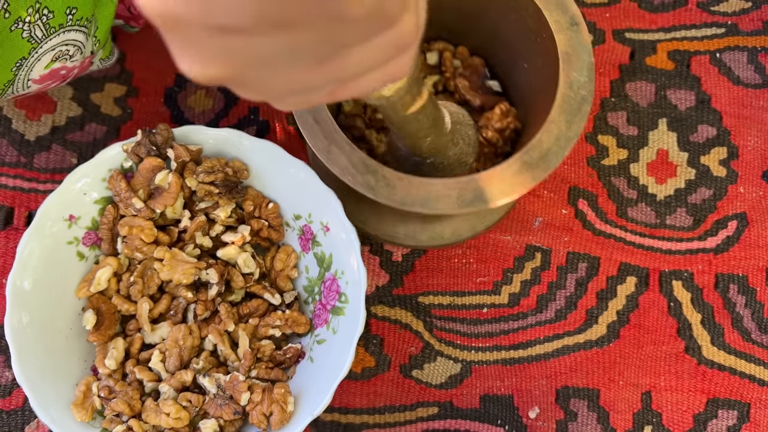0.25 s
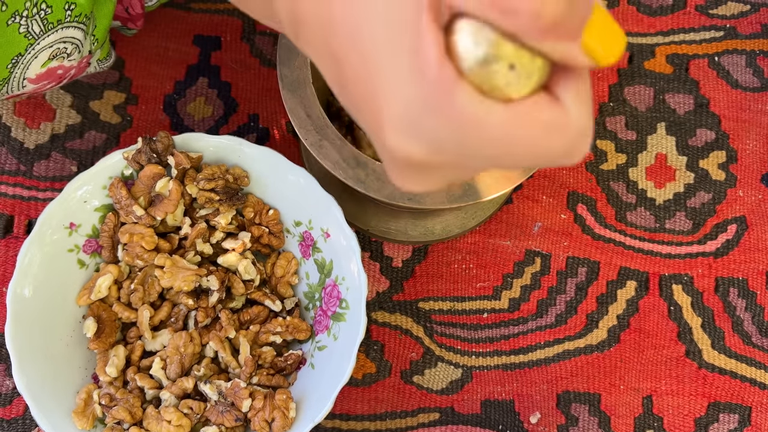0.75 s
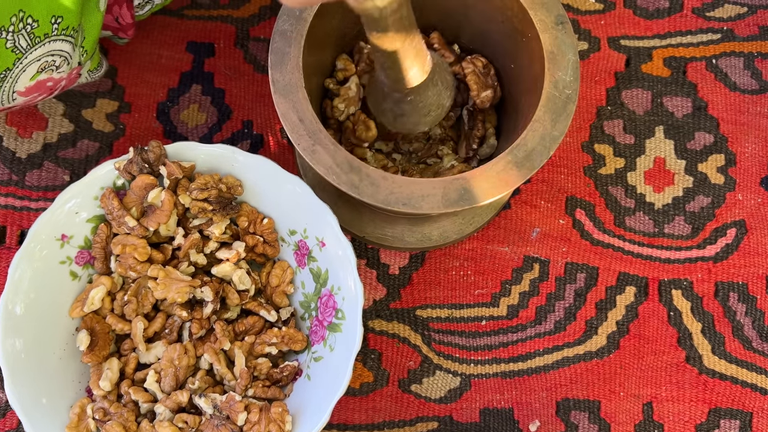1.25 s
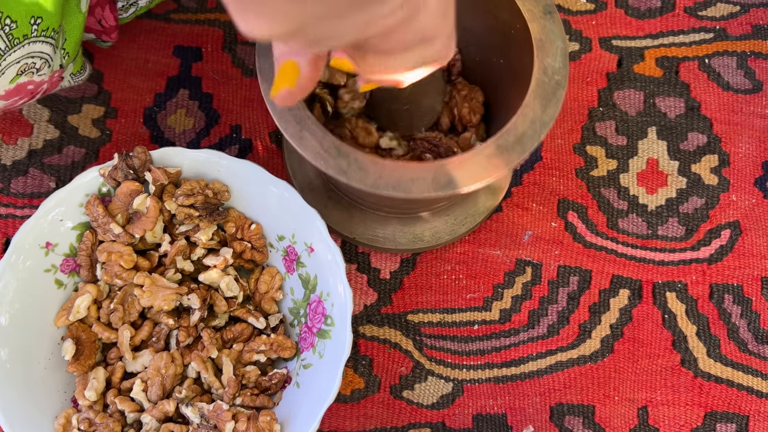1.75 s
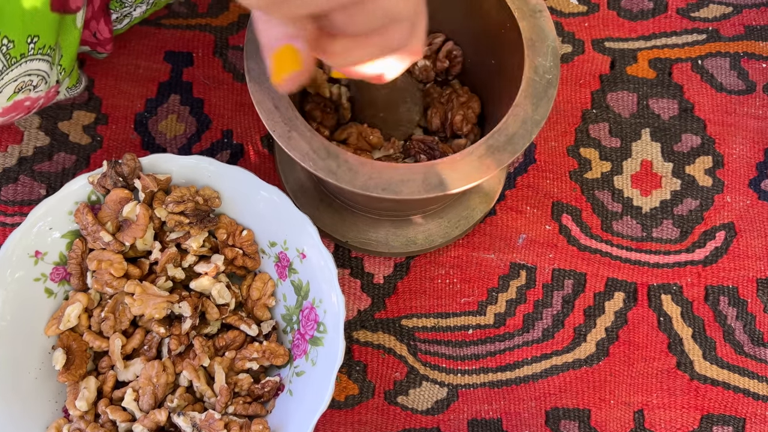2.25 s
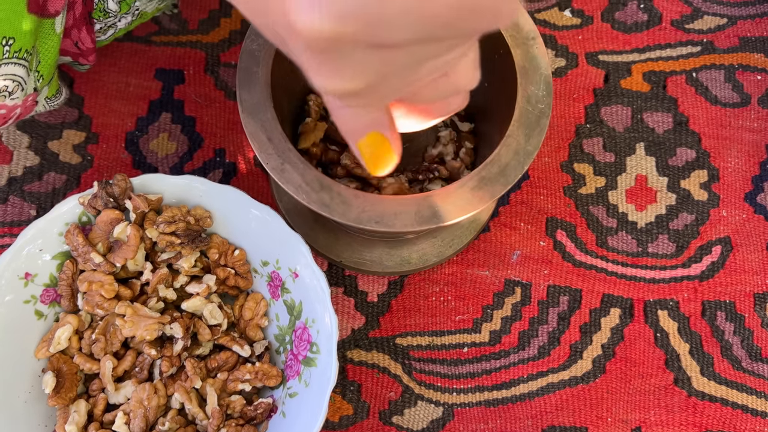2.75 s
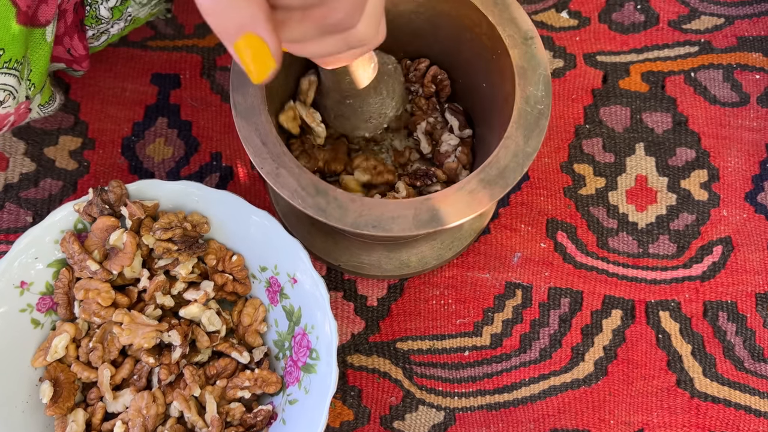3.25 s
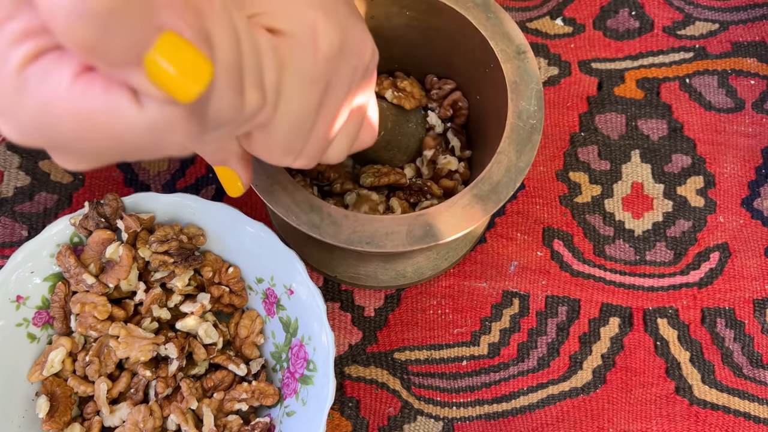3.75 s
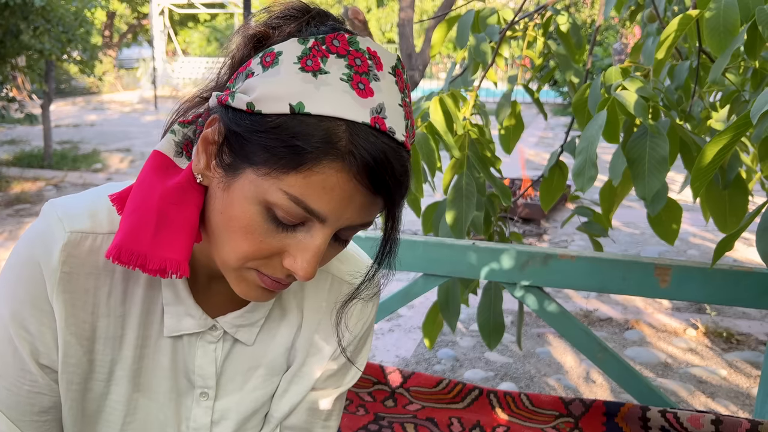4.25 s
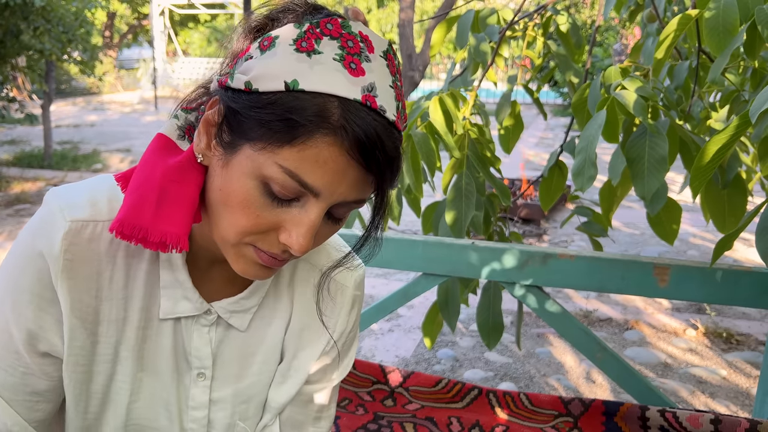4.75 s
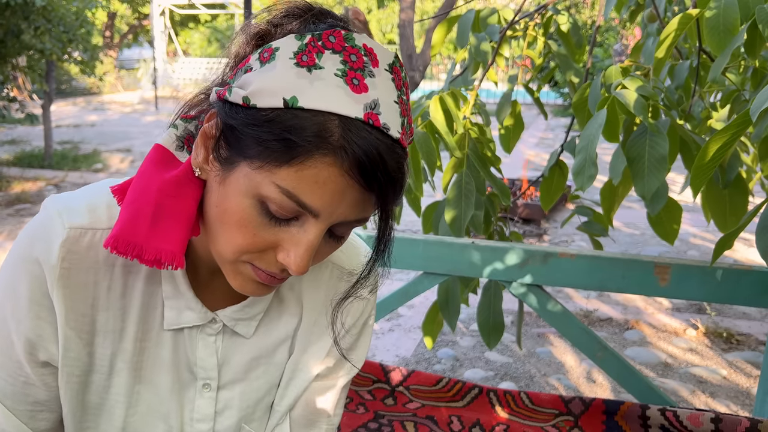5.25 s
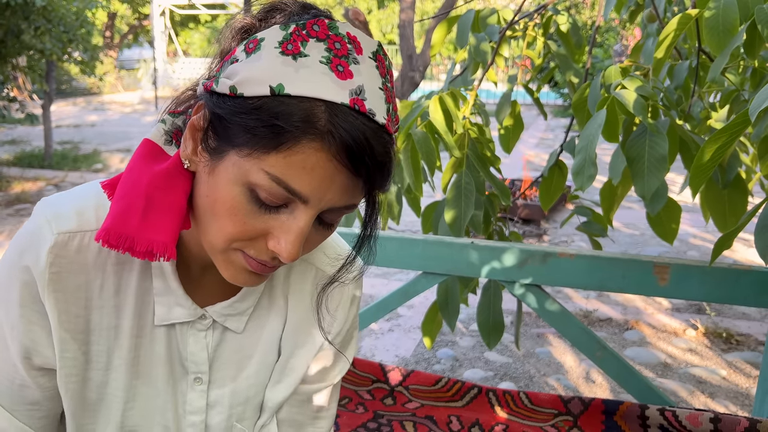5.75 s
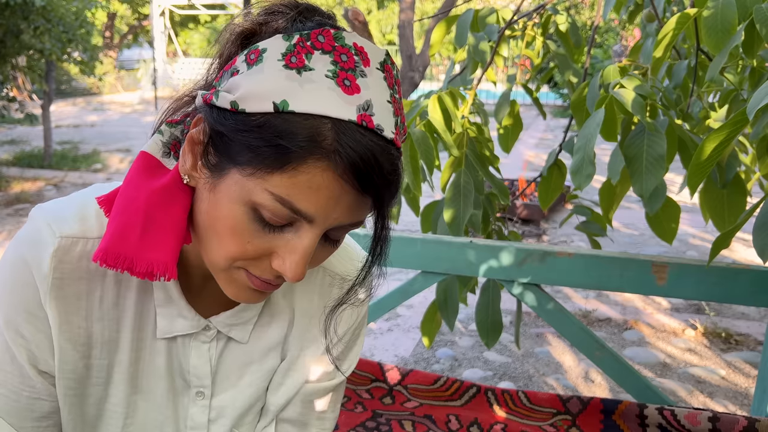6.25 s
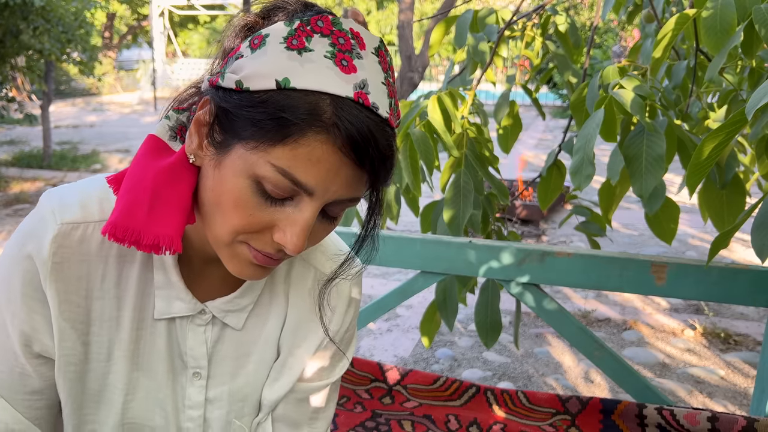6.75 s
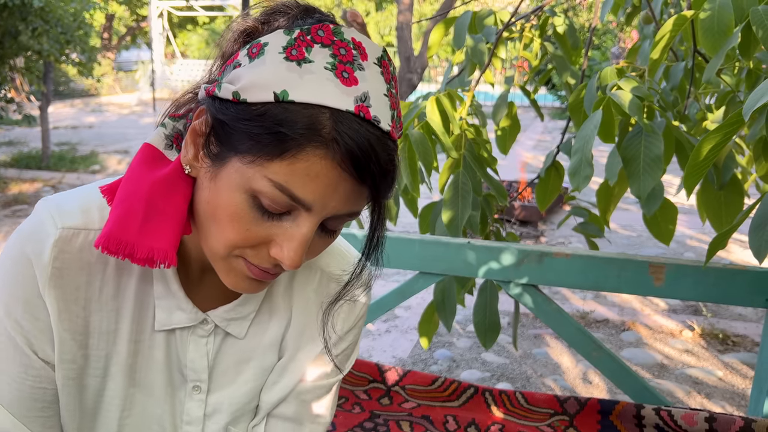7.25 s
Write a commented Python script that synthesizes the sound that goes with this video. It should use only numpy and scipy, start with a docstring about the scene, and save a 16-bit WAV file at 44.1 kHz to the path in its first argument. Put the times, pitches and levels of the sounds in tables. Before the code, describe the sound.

A brass pestle clinks twice against a brass mortar, then crushes walnuts with sharp snaps, gritty crunches and dull thuds against the ground. Further strikes on the wall set the bowl ringing now and then. The crunching grows lighter in the second half, with a hollow knock among the clinks. The microphone is close, outdoors, with faint distant traffic, leaves and a barely audible bird near the end.

```python
"""Outdoors, close to a brass mortar on a rug; traffic and leaves murmur far off throughout.
The brass pestle first strikes the wall three times, and the bowl rings in close, beating pairs of modes.
Then it crushes walnuts: kernels crunch and snap and the mortar thuds on the ground, between more blows
on the wall and a few hollow knocks. Near the end come two faint bird cheeps and a short whistle."""
import sys
import numpy as np
from scipy import signal
from scipy.fft import rfft, irfft, next_fast_len
from scipy.io import wavfile
from scipy.ndimage import uniform_filter1d, map_coordinates

SR = 44100
rng = np.random.default_rng(int(sys.argv[2]) if len(sys.argv) > 2 else 0)


def wav_record(signal):
    """Record a signal, one row per channel, as 16-bit PCM in the file named by sys.argv[1]."""
    frames = np.transpose(np.atleast_2d(signal))
    bounded = np.clip(frames, -1, 1)
    # unit amplitude maps onto the largest positive 16-bit level
    quanta = np.round(bounded * 32767).astype(np.int16)
    wavfile.write(sys.argv[1], SR, quanta)


N = 331191

# Modes of the bowl, close twins side by side: f/Hz
MODE_HZ = [1162, 1173, 1185, 2046, 2722, 2736, 3220, 4097, 4089, 4926, 4944, 5057, 5068, 5608, 5620, 6515,
           6539, 6577, 7074, 7500, 7885, 8426, 8788, 8893, 9410, 9725, 11760, 12172, 12493, 12570, 14810]
# The same modes: level/dB, t60/s, right minus left/dB, lead at the right microphone/rad
MODES = [(0.8, 0.92, -3.5, 0), (-2.8, 1.185, 2, -1.76), (4.5, 0.17, -0.5, 1.5), (-2, 0.035, 8.5, 7),
         (3, 0.65, -3.5, 2.5), (2.5, 1.13, 0.5, 2.5), (-0.5, 0.064, 13, 4), (11, 0.53, -11, 2),
         (-11, 1.7, -10, 7.5), (1.5, 0.35, -0.5, 1.5), (-6, 0.333, -17, 19.5), (-26, 0.35, -5.5, 3.5),
         (1, 0.21, -26.5, 5), (5, 0.43, -9.5, 2), (9.5, 0.41, -12.5, 3.2), (-10.5, 0.19, -3, 5.5),
         (2.5, 0.22, -15.5, 15), (-9, 0.48, -6, 4.5), (-11, 0.24, -2, -2), (2.5, 0.22, 4.5, 0.7),
         (-12, 0.18, 1, 0.3), (-18, 0.21, 2, 1.2), (-8, 0.3, -4.5, 1.7), (-9, 0.32, -3, 1),
         (-12, 0.19, -3, 3), (-10, 0.43, 0, 4.5), (-22, 0.28, 1, 2), (-9, 0.52, -1.5, 0.3),
         (-20, 0.37, -1.5, .7), (-22, 0.28, -1, 1.4), (-12, 0.27, 2, -2)]
# Pestle on the wall: t/s, low twins' share/rad, upper low twin's phase/rad, middle twins' share/rad,
# seven family levels/dB (low twins, short clang, middle twins, around 4.1, 5, 5.6 and 7.5 kHz),
# damping factor, right side/dB, crack/dB, chatter/dB, time until nuts or hand muffle the ring/s
BLOWS = [(0.086, 1.7, -2.5, 0.44, -55, -59, -60, -57, -71, -62, -70, 2, 5.5, -32, -48, 0.069),
         (0.2144, 1.52, 1, 0.066, -18, -23, -27.5, -29.5, -28.5, -23.5, -30, 1.52, -5.5, -19.5, -74, 0.2),
         (0.3, 1.06, 2.5, 0.068, -28.5, -13.5, -28.5, -25.5, -32, -22, -42, 2.7, 0, -28.5, -35.5, 0.15),
         (1.4178, 1.38, -3, 0.7, -13.5, -62, -32.5, -42.5, -43, -50, -42, 0.97, -3.5, -25.5, -55, 0.6),
         (2.334, 1.3, -1.5, 0.79, -45.5, -66, -58, -73, -82, -75, -80, 0.8, -5.5, -64, -65, .15),
         (3.15, 0.72, 0, 1, -49.5, -57, -51.5, -63, -51, -75, -70, 0.74, -3.5, -41, -65, 0.2),
         (3.334, 1.09, 1.14, 0.84, -21.5, -9, -21.5, -23.5, -19.5, -41, -39.5, 1.31, -3, -39.5, -23.5, 0.26),
         (3.968, .06, 9, .5, -41.5, -66, -63, -68, -55.5, -68.5, -72, 1.3, -6.5, -40.5, -56, 0.064),
         (4.0614, 0.91, -2, 2.18, -24, -61, -38, -54.5, -59, -56.5, -73, 1.24, -9.5, -40, -62, 0.22),
         (5.011, 1.07, 2, 1.38, -20, -17, -23, -44, -20, -34, -59, 1.26, -10, -23, -31, 0.27),
         (5.612, 1.3, -4, 1.5, -59, -78, -79, -63, -61.5, -65, -77, 0.74, -8.5, -62, -73, 0.13),
         (6.619, 1.6, -0.5, 0.9, -58, -74, -63, -73.5, -54.5, -79, -84, 0.93, -7, -58.5, -70, 0.18),
         (6.7892, 0.77, -1.4, 1.6, -24, -40, -42, -50, -34, -43.5, -59, 1.13, -6, -29, -47.5, 0.21)]
# Spectra of breaking walnut, its sharp edge and its body: f/Hz, level/dB
SHARP_SPECTRUM = [(1500, -49.5), (2500, -8), (4000, -2), (6800, 2.5), (9000, -1), (12000, 1.5), (15500, 0)]
BODY_SPECTRUM = [(150, 8), (500, -12), (760, 9), (1200, -11.5), (1880, 6.5), (2250, 2), (2630, 6.5),
                 (3400, 0), (4010, -1), (5000, -15), (7000, -5.5)]
# How alike the two microphones hear a close source: f/Hz, correlation
NEAR_LIKENESS = [(100, .97), (400, .8), (1500, .7), (5000, .4), (7500, .5), (9000, .97), (15000, .98)]


def amp(db):
    """Gain of a level in dB."""
    return 10 ** (np.asarray(db) / 20)


def unit(x):
    """x at rms 1."""
    return x / np.sqrt(np.mean(x ** 2) + 1e-20)


def along(points, hz):
    """Interpolate (f/Hz, value) points on a log frequency axis."""
    f, v = np.transpose(points)
    return np.interp(np.log(hz + 1), np.log(f + 1), v)


def curves(rows):
    """One value per sample for each column after the time."""
    s, *cols = np.transpose(rows)
    return [np.interp(np.arange(N) / SR, s, c) for c in cols]


def wobble(rate):
    """A smooth random curve, rate knots a second."""
    return map_coordinates(rng.standard_normal(int(N * rate / SR) + 4), [np.arange(N) * rate / SR])


def filtered(x, response):
    """x times a complex response of frequency."""
    m = next_fast_len(N + SR // 2)
    return irfft(rfft(x, m) * response(np.fft.rfftfreq(m, 1 / SR)), m)[..., :N]


def shaped(x, spectrum):
    """x filtered by (f/Hz, level/dB) points."""
    return filtered(x, lambda hz: amp(along(spectrum, hz)))


def add(track, s, sound):
    """Lay a sound into a track at time s."""
    part = track[..., round(s * SR):][..., :sound.shape[-1]]
    part += sound[..., :part.shape[-1]]


def microphones(pair, likeness):
    """Two unrelated signals become left and right, with the microphones' likeness, balance and lead."""
    # Left microphone over the right: f/Hz, level/dB
    balance = [(100, 1.5), (700, 4), (2400, 2.5), (4800, 7.5), (7000, 7), (9000, 0.5), (15000, 0)]
    # Left microphone ahead of the right: f/Hz, phase/rad
    lead = [(200, 0), (800, .3), (1700, 1.2), (2750, 2), (3450, 3.1), (5400, 7), (7200, 8.4), (9000, 5.3),
            (10000, 3.4), (11000, 1.7), (12050, -.1), (13100, -2.1), (14100, -3.7), (15200, -5.8)]
    turn = lambda hz: np.arccos(np.clip(along(likeness, hz), 0, 1)) / 2
    mid, side = filtered(pair, lambda hz: np.array([np.cos(turn(hz)), np.sin(turn(hz))]))
    half = lambda hz: amp(along(balance, hz) / 2) * np.exp(1j * along(lead, hz) / 2)
    return filtered(np.array([mid + side, mid - side]), lambda hz: np.array([half(hz), 1 / half(hz)]))


def traffic_and_leaves():
    """Far off, traffic rumbles and leaves hiss softly, both wavering."""
    # Course of the background: t/s, traffic/dB, leaves/dB
    levels = [(0.0, -55.5, -53.5), (0.6, -47, -58.5), (1.2, -52.5, -58), (1.82, -51, -57.5),
              (4.2, -53, -58.5), (5, -51, -57.5), (6.15, -55.5, -60), (7.15, -51.5, -57),
              (7.51, -54, -61.5)]
    # Spectra of the rumble and the hiss: f/Hz, level/dB
    traffic_spectrum = [(20, -50.5), (40, -10), (65, 1), (110, 5.5), (160, -6.5), (260, -15.5), (400, -55)]
    leaf_spectrum = [(150, 5.5), (290, 1), (420, 2), (700, -7.5), (1160, -7.5), (2000, -15), (3000, -24),
                     (5000, -21), (6740, -17.5), (9000, -48.5), (16000, -48)]
    # How alike the microphones hear a distant source: f/Hz, correlation
    far_likeness = [(60, .97), (200, .85), (500, .3), (5000, .2), (7500, .4), (9000, .95), (15000, .97)]
    traffic_db, leaves_db = curves(levels)
    noise = lambda spectrum: unit(shaped(rng.standard_normal((2, N)), spectrum))
    rumble = amp(traffic_db + 1.6 * wobble(6)) * noise(traffic_spectrum)
    hiss = amp(leaves_db + 1.4 * wobble(6.5)) * noise(leaf_spectrum)
    return microphones(rumble + hiss, far_likeness)


def bird_cheeps():
    """A distant bird cheeps twice: falling tones, hoarse with pitch jitter."""
    # Calls: t/s, level/dB
    calls = [(6.405, -61), (6.601, -56)]
    start_hz, fall_hz_per_s, rough_hz, length_s = 2750, 17000, 258, 0.051
    out, t = np.zeros((2, N)), np.arange(round(length_s * SR)) / SR
    for s, db in calls:
        jitter = np.array([wobble(510)[:len(t)], wobble(433)[:len(t)]])
        hz = start_hz - fall_hz_per_s * t + rough_hz * jitter
        tone = np.sin(2 * np.pi * np.cumsum(hz, axis=1) / SR)
        add(out, s, amp(db) * np.sin(np.pi * t / length_s) * tone)
    return out


def bird_whistle():
    """Off to the right, a faint whistle swings in pitch; a second voice above it soon fades."""
    middle_hz, swing_hz, swing_s, length_s = 4050, 440, .056, .09
    out, t = np.zeros((2, N)), np.arange(round(length_s * SR)) / SR
    hz = middle_hz + swing_hz * np.sin(2 * np.pi * t / swing_s) + 100 * wobble(293)[:len(t)]
    phase = 2 * np.pi * np.cumsum(hz) / SR
    voices = np.sin(phase) + amp(-3) * np.exp(-(t / .035) ** 2) * np.sin(1.16 * phase)
    envelope = amp(-67 + 3 * wobble(213)[:len(t)]) * np.sin(np.pi * t / length_s) ** 0.38
    add(out, s=7.382, sound=envelope * voices * amp([[-6], [3]]))
    return out


def ground_thuds():
    """The mortar thuds on the ground: a low tone of sagging pitch in a puff of dull noise."""
    # Thuds through the rug: t/s, level/dB, starting f/Hz
    thuds = [(0.208, -47, 109), (0.547, -39.5, 97.6), (0.722, -34.5, 82.6), (0.861, -41.5, 159),
             (1.012, -43.5, 80.6), (1.798, -26, 70.5), (1.928, -42, 88.5), (1.994, -34.5, 71.6),
             (2.213, -42, 130), (2.596, -31, 105.6), (2.64, -32, 100), (2.674, -32.5, 68),
             (2.804, -31.5, 89.5), (2.849, -33, 84), (3.045, -42.5, 105), (3.407, -37, 72.5),
             (3.55, -30.5, 75.4), (3.707, -35, 84), (3.755, -40, 80), (4.478, -34.5, 132.5),
             (5.33, -34.5, 98), (5.496, -42.5, 114), (5.747, -44, 119), (5.853, -38, 108.4),
             (6.209, -44, 89), (6.609, -43, 123), (6.79, -41, 93), (7.213, -37.5, 102.4)]
    rise_s = 0.013
    tones, puffs, t = np.zeros(N), np.zeros(N), np.arange(SR // 4) / SR
    for s, db, hz in thuds:
        push = amp(db) * (t / rise_s * np.exp(1 - t / rise_s)) ** 2
        add(tones, s, push * np.sin(2 * np.pi * hz * t * (1 - 0.89 * t)))
        add(puffs, s, push * rng.standard_normal(len(t)))
    return tones + amp(13.5) * filtered(puffs, lambda f: (f / 40) / (1 + f / 40) / (1 + (f / 200) ** 3))


def hollow_knocks():
    """Dull knocks in the hollow of the bowl: a note that drops as it starts, with a rough high tick."""
    # Knocks: t/s, level/dB, f/Hz, t60/s
    knocks = [(0.864, -36.5, 687, 0.028), (4.478, -21.5, 719, 0.038), (4.4855, -25, 690, 0.054),
              (6.7885, -27.5, 660, 0.011), (4.568, -45, 805, 0.076), (4.584, -33.5, 675, 0.033)]
    out, t = np.zeros(N), np.arange(SR // 4) / SR
    for s, db, hz, t60 in knocks:
        note = np.sin(2 * np.pi * hz * (t + 0.00036 * (1 - np.exp(-t / 0.0024))))
        overtone = 0.12 * np.sin(2 * np.pi * 1.7 * hz * t)
        tick = .08 * np.sin(2 * np.pi * 4200 * t) * wobble(700)[:len(t)]
        rattle = (note + overtone + tick) * amp(2.4 * wobble(164)[:len(t)])
        add(out, s, amp(db - 60 * t / t60) * rattle * (1 - np.exp(-t / 0.00079)))
    return out


def pestle_pressure():
    """Gains of rustle, body and hum: each push rises fast, sags while held and falls away."""
    # Loose crumbs stirred between pushes: t/s, rustle/dB, body/dB, brass hum/dB
    stirring = [(0, -84, -49, -39), (.4, -60.5, -64, -66), (.8, -55.5, -61.5, -85),
                (1.25, -104, -60.5, -52), (1.6, -87.5, -72.5, -52), (2.2, -62, -56.5, -46.5),
                (2.95, -75.5, -63, -54.5), (3.25, -62, -60.5, -41.5), (3.8, -75, -53.5, -42.5),
                (4.1, -73.5, -68.5, -65), (4.5, -63.5, -75, -49.5), (4.9, -90, -90, -61.5),
                (5.4, -65, -69.5, -57), (5.7, -94, -84, -55), (6.1, -65, -71, -63),
                (6.45, -79.5, -78.5, -63), (7, -65, -67.5, -45.5), (7.51, -94, -78, -62)]
    # Kernels giving way under one push: t/s, hold/s, level/dB, relative body/dB
    crushes = [(0.53, 0.026, -41.5, -11), (0.701, 0.024, -39.5, 1), (0.866, 0.0081, -48.5, -6),
               (0.904, 0.071, -56.5, -36), (1.328, 0.095, -57.5, -13), (1.519, 0.031, -51.5, 4.5),
               (1.708, 0.018, -42.5, -15), (1.742, 0.044, -39.5, -1), (1.912, 0.13, -45.5, -8.5),
               (2.559, 0.082, -39, -3.5), (2.792, 0.061, -49.5, -3), (3.039, 0.045, -55, -8),
               (3.128, 0.077, -54, 0), (3.325, 0.086, -48, -7.5), (3.52, 0.0056, -45.5, 0),
               (3.638, 0.12, -51.5, -22), (4.16, 0.08, -60.5, -23.5), (4.428, 0.047, -53.5, -14),
               (4.595, 0.13, -62.5, 1), (5.0, 0.092, -56, -14), (5.167, 0.056, -56.5, -3.5),
               (5.302, 0.035, -45.5, -5.5), (5.561, 0.056, -58.5, -15.5), (5.845, 0.019, -47.5, -11.5),
               (6.143, 0.071, -52.5, -15.5), (6.797, 0.073, -56.5, -7), (6.99, 0.15, -71.5, -13),
               (7.193, 0.025, -46, -7)]
    rise_db_per_s, sag_db_per_s, fall_db_per_s = 1098, 22.5, 534
    rustle, body, hum = amp(np.array(curves(stirring)) + 4.5 * wobble(21))
    start, hold, db, body_db = np.transpose(crushes)[:, :, None]
    t = np.arange(N) / SR - start
    drop_db = sag_db_per_s * np.clip(t, 0, hold) + fall_db_per_s * np.maximum(t - hold, 0)
    pushes = amp(db + rise_db_per_s * np.minimum(t, 0) - drop_db)
    total = pushes.sum(axis=0)
    return rustle + total, body + (pushes * amp(body_db)).sum(axis=0), hum + amp(2) * total


def walnut_crunch():
    """Dense uneven fractures under the pestle, and the brass they set humming."""
    rustle, body, hum = pestle_pressure()
    fractures = (rng.random(N) < .03) * amp(np.clip(3 * rng.exponential(size=N), 0, 9))
    grit = (unit(fractures) + 1.03) * rng.standard_normal((2, N)) * amp(1.77 * wobble(120))
    # random patches in frequency and time give each fracture its own colour
    spectra = signal.stft(grit, nperseg=256)[2]
    patches = uniform_filter1d(rng.standard_normal(spectra.shape[1:]), size=9, axis=0)
    patches = unit(uniform_filter1d(patches, size=4, axis=1))
    grit = unit(signal.istft(spectra * amp(4 * patches), nperseg=256)[1][:, :N])
    crunch = rustle * unit(shaped(grit, SHARP_SPECTRUM)) + body * unit(shaped(grit, BODY_SPECTRUM))
    width_hz = 14  # nuts lying on the brass broaden its modes
    ringing_hz = [hz for hz, (_, t60, *_) in zip(MODE_HZ[:20], MODES) if t60 > .1]
    brass = lambda f: sum(1j * f * width_hz / (hz * hz - f * f + 1j * f * width_hz) for hz in ringing_hz)
    return crunch + filtered(hum * grit, brass)


def walnut_snaps():
    """Single kernels snap: noise bursts with a hard front and a short tail."""
    # Snaps: t/s, level/dB, relative body/dB
    snaps = [(0.381, -28, -17), (0.462, -35.5, -17), (0.5253, -13, -11.5), (0.538, -21.5, -9),
             (.551, -18.5, -16), (.563, -25, -8), (.678, -28.5, -1), (0.6916, -22, 3.5), (0.7, -19, -4.5),
             (.7062, -16.5, -20), (0.719, -17.5, -4), (.727, -27, -7), (0.7542, -29, -17.5),
             (0.8649, -24.5, 3.5), (1.547, -31, 0.5), (1.684, -35, -15), (1.7074, -28, -15),
             (1.722, -25.5, -8.5), (1.7377, -32.5, -4), (1.91, -27, -16), (1.9182, -19, -19.5),
             (1.9317, -21, -10), (1.9675, -20, -11), (1.982, -29, -28), (2, -20, -19), (2.0557, -30.5, -31),
             (2.5755, -12.5, 0), (2.624, -21.5, -7), (2.6381, -14, -5.5), (2.772, -27.5, -12),
             (2.8005, -27, -7), (2.9107, -34.5, -6), (3.0353, -29, -2), (3.067, -32, -15),
             (3.1552, -25.5, -11.5), (3.2007, -36.5, -21), (3.497, -32.5, -24), (3.5174, -16.5, -12),
             (3.654, -25, -5.5), (3.661, -14, -53.5), (3.691, -25.5, -22.5), (3.76, -26, 2),
             (4.1752, -26.5, -25.5), (4.2673, -34.5, -13.5), (4.3097, -41, 0), (5.213, -32.5, -3),
             (5.292, -26.5, -16.5), (5.337, -24.5, -11), (5.421, -34.5, -14), (5.475, -42, -22),
             (5.494, -42, -18), (5.8524, -28.5, 0), (6.0842, -38.5, -25), (6.132, -31.5, -29),
             (6.3433, -44, -10), (6.993, -31, -5), (7.0453, -31.5, -8.5)]
    sharp, body, t = np.zeros((2, N)), np.zeros((2, N)), np.arange(SR // 50) / SR
    envelope = (amp(-60 * t / 0.025) + 1.2 * amp(-60 * t / 0.0023)) * (1 - np.exp(-t / 0.00016))
    for s, db, body_db in snaps:
        burst = rng.standard_normal((2, len(t))) * envelope
        add(sharp, s, amp(db - 9.5) * burst)
        add(body, s, amp(db + body_db - 12.5) * burst)
    return shaped(sharp, SHARP_SPECTRUM) + shaped(body, BODY_SPECTRUM)


def pestle_contact():
    """Brass lands on brass with a crack, then chatters along the wall for a moment."""
    bounce_s, bounce_db = 4.0698, -29  # the pestle touches once more after one blow
    crack, chatter, t = np.zeros((2, N)), np.zeros((2, N)), np.arange(SR) / SR
    for s, *_, crack_db, chatter_db, _ in BLOWS:
        add(crack, s, rng.standard_normal((2, SR)) * amp(crack_db - 60 * t / 0.0025))
        add(chatter, s, rng.standard_normal((2, SR)) * amp(chatter_db - 20 * (t / 0.057) ** 2))
    add(crack, bounce_s, rng.standard_normal((2, SR)) * amp(bounce_db - 60 * t / 0.0037))
    darkened = signal.lfilter([1], [1, -.82], crack)
    low_cut = lambda f: 1j * f / (250 + 1j * f)
    mid_band = lambda f: 1 / (1 + (450 / (f + 1)) ** 3) / (1 + (f / 1500) ** 1.86)
    return filtered(darkened, low_cut) + 3 * filtered(chatter, mid_band)


def bowl_ring():
    """Each blow starts every mode; close twins beat, and later contact chokes the treble most."""
    # For each mode, which of a blow's seven levels drives it: family index
    family = [0, 0, 1, 5, 2, 2, 3, 3, 3, 4, 4, 4, 4, 5, 5, 4, 4, 4, 4, 6, 4, 4, 6, 6, 6, 6, 4, 6, 4, 4, 6]
    # After moved_s the microphones stand elsewhere; mode index: right minus left/dB, right lead/rad
    moved = {1: (0.6, 3.1), 4: (1.5, -2.2), 5: (5, -1.62), 7: (1.1, 0)}
    moved_s = 4
    muffle_db_per_s = 209  # for each kHz from 3 to 6 kHz
    restrike_s, restrike_db_per_s = .1, 800  # a blow this soon after another stops its ring
    out, t = np.zeros((2, N)), np.arange(SR) / SR
    hz, twin = np.array(MODE_HZ)[:, None], np.arange(len(MODES))[:, None] % 2
    db, t60, right_db, lead = np.transpose(MODES)[:, :, None]
    # the 4.1 kHz pair radiates more evenly; above 8 kHz a blow's side makes no difference
    sided = np.where(np.abs(hz - 4100) < 100, .3, hz < 8000)
    start_phase = twin * np.where(hz < 3000, 2.1, 3.84) + 2.48 * (hz == MODE_HZ[2])
    waits = np.diff([blow[0] for blow in BLOWS], append=N)
    for blow, wait in zip(BLOWS, waits):
        s, low, upper_phase, middle, *levels, damping, side_db, _, chatter_db, muffle_s = blow
        level = np.array(levels)[family][:, None] + db + 2.2 * (hz > 7000) * rng.standard_normal(hz.shape)
        # the place struck shares the blow between twins
        share = np.ones(hz.shape)
        share[[0, 1, 4, 5], 0] = np.abs([np.cos(low), np.sin(low), np.cos(middle), np.sin(middle)])
        share[8] = amp(60 * amp(chatter_db))  # chatter wakes the weaker 4.1 kHz twin
        choke = muffle_db_per_s * np.clip(hz / 1000 - 3, 0, 3) * np.clip(t - muffle_s, 0, None)
        choke += (wait < restrike_s) * restrike_db_per_s * np.clip(t - wait, 0, None)
        # strong chatter keeps feeding the modes, the middle ones longest, so they swell slowly
        rise_s = 0.00037 + amp(chatter_db) * np.where((hz > 2500) & (hz < 4500), 0.68, 0.08)
        envelope = share * amp(level - 60 * t * damping / t60 - choke) * (1 - np.exp(-t / rise_s))
        start_phase[1] = upper_phase
        phase = 2 * np.pi * hz * t + start_phase
        if s > moved_s:
            right_db[list(moved), 0], lead[list(moved), 0] = np.transpose(list(moved.values()))
        left = np.sum(envelope * np.sin(phase), axis=0)
        right = np.sum(envelope * amp(right_db + side_db * sided) * np.sin(phase + lead), axis=0)
        add(out, s, np.array([left, right]))
    return out


def scene():
    """The distant background and the close mortar at the two microphones."""
    background = traffic_and_leaves() + bird_cheeps() + bird_whistle()
    pounding = (ground_thuds() + hollow_knocks()) * amp([[1], [-1]])  # slightly left
    crushing = microphones(walnut_crunch() + walnut_snaps() + pestle_contact(), NEAR_LIKENESS)
    return background + pounding + crushing + bowl_ring()


def record(dry):
    """The recorder weakens the highest treble and keeps nothing above its band limit."""
    shelf_hz, top_hz = 15800, 16900
    shelf = lambda hz: amp(np.where(hz > shelf_hz, -18 - (hz - shelf_hz) / 60, 0))
    return filtered(dry, lambda hz: (hz < top_hz) * shelf(hz))


dry = scene()
out = record(dry)
wav_record(out)
```